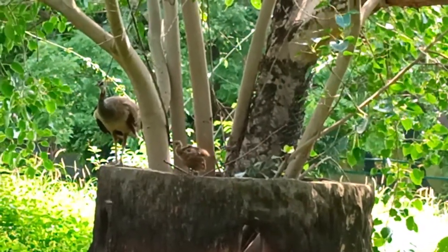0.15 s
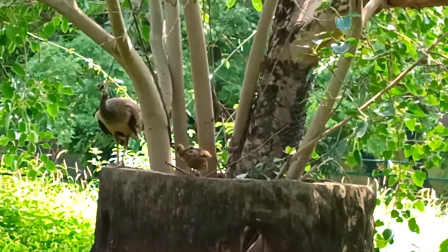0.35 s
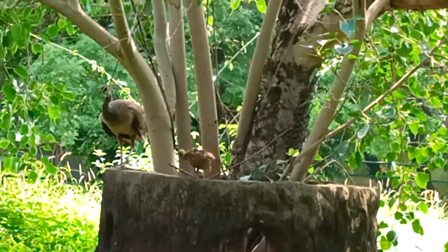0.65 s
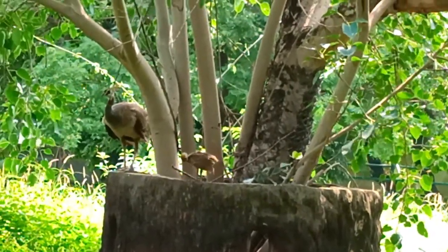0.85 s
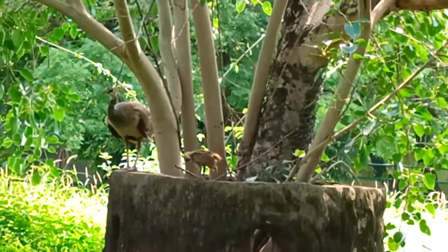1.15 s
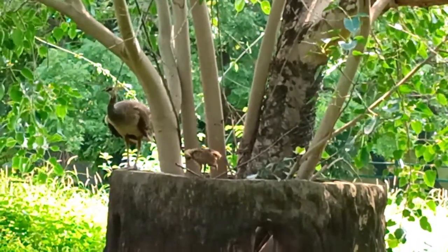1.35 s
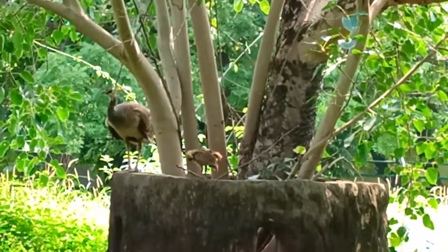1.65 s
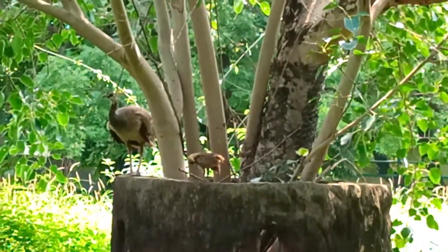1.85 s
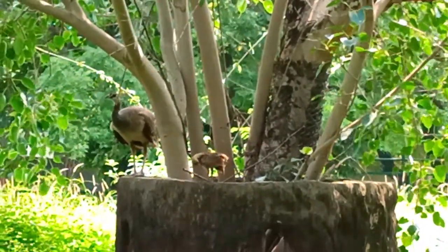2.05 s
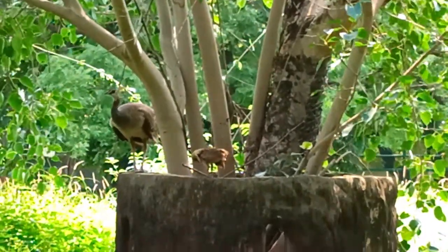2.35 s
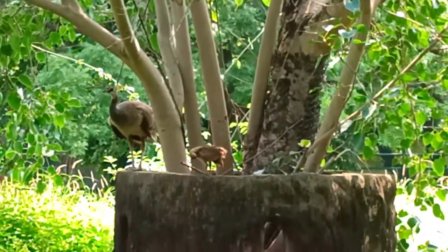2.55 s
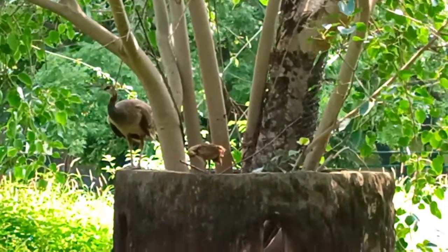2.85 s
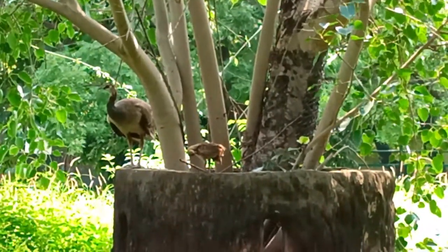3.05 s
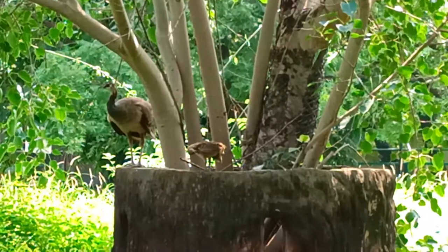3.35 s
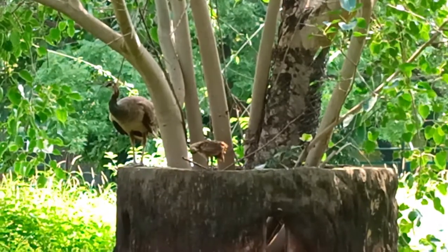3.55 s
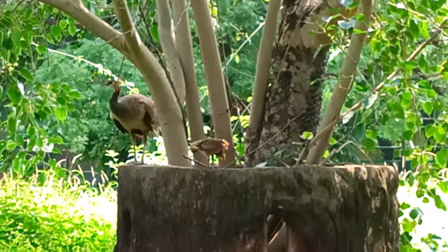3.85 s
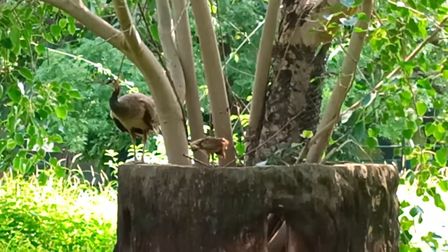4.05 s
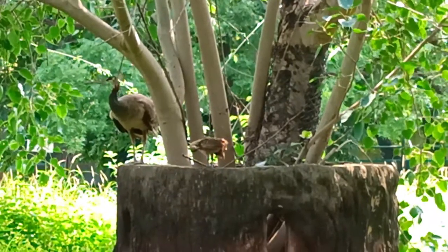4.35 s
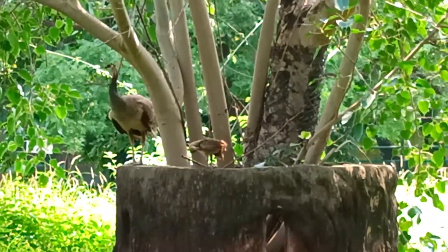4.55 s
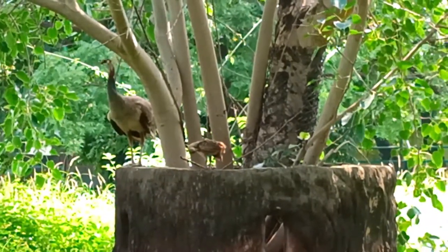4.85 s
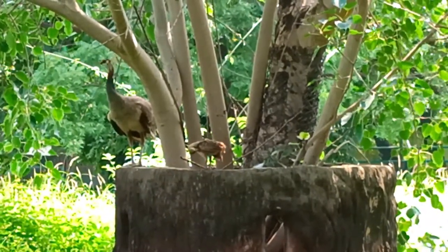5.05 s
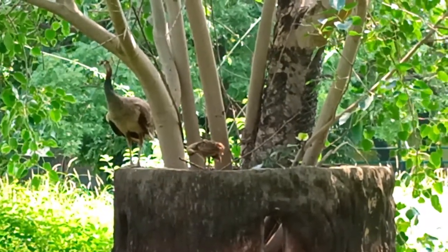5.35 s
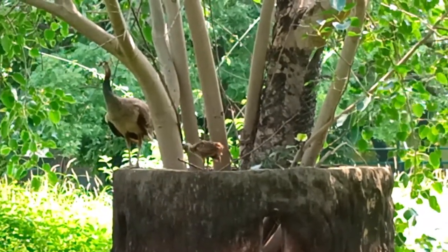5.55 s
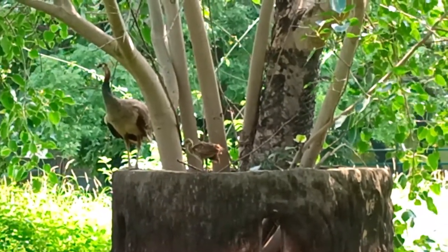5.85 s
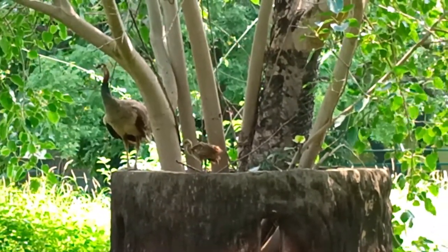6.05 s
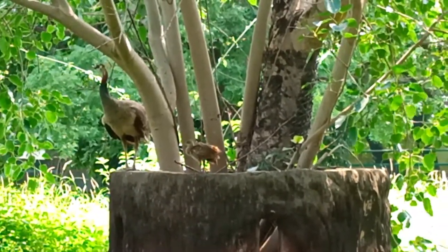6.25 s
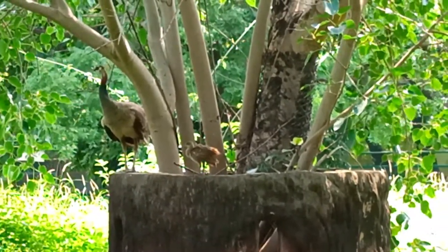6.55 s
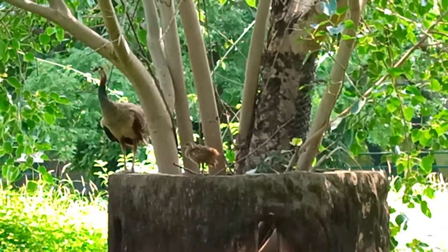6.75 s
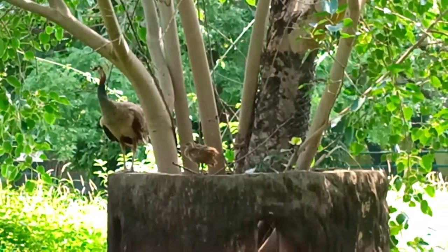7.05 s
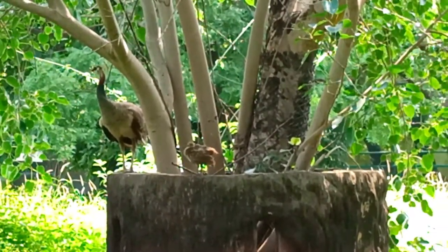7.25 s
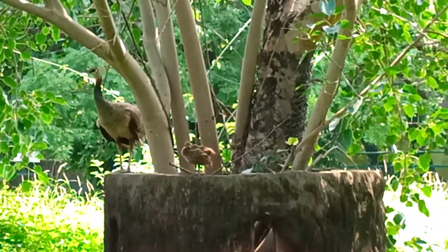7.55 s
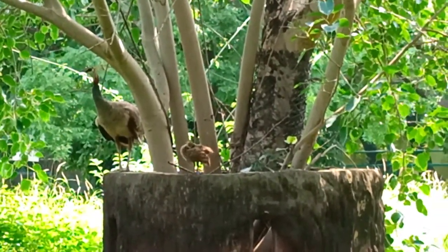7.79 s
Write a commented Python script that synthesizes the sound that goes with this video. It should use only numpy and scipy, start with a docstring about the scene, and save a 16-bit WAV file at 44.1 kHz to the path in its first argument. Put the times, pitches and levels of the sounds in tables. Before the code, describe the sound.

A handheld microphone picks up a strident, honking peafowl voice with a clear woodland echo. Two spaced cries break upward and fall away; a tiny dropout and close handling-like squeaks lead into one sinking wail and one hesitant climbing wail. Then three full cries arrive in quicker succession. Between them soft distant traffic, leaf noise, a thin insect whirr and low engine rumble swell back up.

```python
"""A peafowl cries loudly five times among trees: each time a short low note leaps into a long arch. Midway the
sound drops out briefly and comes back on the sinking end of a cry; then the bird gives a lower, looser wail
that hesitates before it climbs, with scratchy squeaks close to the microphone. The voice is a stack of partials
shaped by throat resonances, plus puffs of air; filtered noise makes the grove throw each call back. Behind are
a noise wash of far traffic and leaves, an insect whirr, and a distant engine that fades and edges back up. Gain
control pushes the background down under the calls and lets it swell up again."""
import sys
import numpy as np
from scipy import signal
from scipy.fft import rfft, irfft, next_fast_len
from scipy.io import wavfile
from scipy.ndimage import uniform_filter1d, minimum_filter1d

SR = 44100
rng = np.random.default_rng(int(sys.argv[2]) if len(sys.argv) > 2 else 0)


def master_out(mix):
    """Clip the mix to full scale and print it as 16-bit PCM to the path in sys.argv[1]."""
    frames = np.transpose(np.atleast_2d(mix))
    ceiling = np.clip(frames, -1, 1)
    pcm = np.round(ceiling * 32767).astype(np.int16)
    wavfile.write(sys.argv[1], SR, pcm)


N = 349272
TIME = np.arange(N) / SR


# The five full cries. Each row: start, leap, crest and end in seconds, low note in Hz, crest in Hz,
# sag after the crest in Hz, level in dB, extra effort at the end in dB, brightness of the low note and
# of the arch in dB per octave, moment the beak is widest in seconds, lower and upper throat resonance then in Hz.
CRIES = [(0.159, 0.293, 0.555, 0.918, 670, 890.8, 41.9, 0, -1, -0.82, 2.5, 0.48, 1930, 3140),
         (1.718, 1.869, 2.170, 2.612, 650, 907.5, 52.75, 0.17, 3, -2.3, 3, 2.09, 1470, 2570),
         (5.369, 5.476, 5.685, 6.059, 683.4, 882, 36.13, 0, 3, -0.55, -1, 5.67, 2170, 3050),
         (6.366, 6.483, 6.650, 7.011, 698.4, 882.8, 34.52, 0, 4.5, 1.3, 0, 6.66, 1580, 2680),
         (7.498, 7.62, 7.775, 8.150, 700.4, 893.3, 54.2, 0.0031, 0, 0.73, -0.5, 7.83, 1513, 2530)]
# What voice and throat pass through in every cry: onset, low note, just before the leap, break, landing,
# settled, crest, last push, start of the fall, end. Each row: effort in dB, lower, upper and top throat
# resonance in Hz, brightness in dB per octave, treble in dB.
CRY_STAGES = [(-16.5, 1800, 2000, 4300, -7.5, -16.5), (2, 1854, 3720, 4300, -2, -18),
              (-5, 1890, 3000, 5100, 4.5, -13), (-2, 1810, 2800, 3300, -15.5, -0.5),
              (6.5, 1735, 2500, 4900, -2, -0.5), (2.5, 1370, 2900, 4800, 0, 3),
              (2, 1720, 4300, 4700, -1, 1), (4.5, 1720, 3330, 4600, 1, 3), (5.5, 1620, 4100, 4900, 2, -1.5),
              (-9, 2020, 2980, 4800, -2, -16.5)]


def cry(start, leap, crest, end, low_hz, crest_hz, sag_hz, level_db, end_db,
        low_bright, arch_bright, widest, open_lower, open_upper):
    """A low note leaps into an arch; effort and throat pass through the same stages each time."""
    scoop_hz, scoop_s = 46.7, .0558
    leap_s, leap_curve = .021, 1.4
    climb_hz_per_s2, sag_curve = 2200, 1.3
    fall_s, fall_hz, fall_curve = .15, 162.4, 1.35
    break_s, land_s, settle_s = .018, .037, .11  # counted from the leap
    push_share = .6  # the last push comes this far from the crest to the fall
    gape_s = .13  # the beak is wide open for about this long either side of its widest

    t = np.arange(start, end, 1 / SR)
    fall = end - fall_s
    fallen = np.maximum(t - fall, 0) / fall_s

    # pitch: a scoop into the low note, a leap, a rounded climb to the crest, a slow sag, a final fall
    low = low_hz - scoop_hz * np.maximum(1 - (t - start) / scoop_s, 0) ** 2
    arch = crest_hz - climb_hz_per_s2 * np.maximum(crest - t, 0) ** 2
    arch -= sag_hz * (np.maximum(t - crest, 0) / (fall - crest)) ** sag_curve
    arch -= fall_hz * fallen ** fall_curve
    leapt = 1 - np.exp(-(np.maximum(t - leap, 0) / leap_s) ** leap_curve)
    pitch_hz = blend(low, arch, leapt)

    push = crest + push_share * (fall - crest)
    stage_s = [start, start + scoop_s, leap, leap + break_s, leap + land_s, leap + settle_s,
               crest, push, fall, end]
    columns = np.transpose(CRY_STAGES)
    effort_db, lower, upper, top, bright, treble_db = (np.interp(t, stage_s, c) for c in columns)
    effort_db = effort_db + end_db * fallen + level_db
    bright = bright + blend(low_bright, arch_bright, leapt)

    # the opening beak draws two resonances to their wide-open places
    gape = np.exp(-((t - widest) / gape_s) ** 4)
    lower = blend(lower, open_lower, gape)
    upper = blend(upper, open_upper, gape)
    no_odd_boost = np.zeros(len(t))
    return call(t, (pitch_hz, effort_db, lower, upper, top, bright, treble_db, no_odd_boost))


# The sinking end of a cry, heard as the sound comes back after the dropout, and a lower, looser wail that
# hesitates before it climbs. Each row: time in seconds, pitch in Hz, effort in dB, lower, upper and top throat
# resonance in Hz, brightness in dB per octave, treble in dB, odd overtones in dB.
SINKING_CRY_END = [(3.65, 717, 1, 1310, 2570, 4970, 1.5, -5, 5),
                   (3.85, 696.8, 0, 1290, 3110, 4800, 3.5, -3.5, -12.5),
                   (3.97, 682, 1, 1320, 2830, 4350, 0.5, -1, -0.5),
                   (4.04, 663, -2.5, 1380, 2610, 4340, 4.5, -3, -7.5),
                   (4.081, 617, -8, 1240, 2600, 4420, -4.5, -9, -5.5)]
CLIMBING_WAIL = [(4.28, 627, -17, 1580, 2520, 4500, -1.5, -1.5, -15.5),
                 (4.337, 629, -12, 1580, 2510, 4500, -2, -0.5, -15),
                 (4.385, 663.6, 1.5, 1460, 2620, 4700, 0.5, -9, -15),
                 (4.494, 620.2, -2.5, 1830, 2680, 4500, 1.5, -8.5, 4.5),
                 (4.56, 609.6, -6.5, 1797, 2650, 4500, 0.5, -9.5, -1.5),
                 (4.601, 682, -1, 1540, 2430, 4750, -1.5, -8, 0.5),
                 (4.842, 773.2, 5, 1515, 2660, 4700, 2.5, -2.5, -3),
                 (4.921, 782.6, 5.5, 1505, 2700, 4720, 2, -4, 3),
                 (4.972, 774.6, 3.5, 1520, 2563, 4610, -7, -9, 2),
                 (5.053, 653, -11.5, 1754, 2420, 4500, 3, -15.5, -5.5)]


def wail(curve):
    """The same voice gliding freely along a short curve."""
    s, *columns = np.transpose(curve)
    t = np.arange(s[0], s[-1], 1 / SR)
    return call(t, [np.interp(t, s, c) for c in columns])


# Fixed colour of windpipe and beak. Each row: frequency in Hz, level in dB.
THROAT = [(620, -11), (770, -9), (880, 0), (1300, -4), (1750, -6), (2300, -14), (3500, -11), (4300, -13),
          (5400, -13.5), (6300, -14), (7400, -42), (8400, -41), (9800, -35), (12500, -54)]
# Colour of the air rushing through the syrinx. Each row: frequency in Hz, relative level in dB.
RASP = [(500, -21.5), (1000, -30), (1700, 7), (3000, 5.5), (5400, 12), (6600, -14), (7600, -35),
        (10000, -35.5), (14000, -53)]


def call(t, controls, jitter=0.00022, waver=0.002, rasp_db=-50, break_db=22, knee_hz=1700,
         treble_hz=4700, flicker_db=0.59, flicker_hz=60, hoarse=0.01):
    """The syrinx buzzes through three moving throat resonances; it turns hoarse where the pitch leaps or sags."""
    size = len(t)
    smooth = (uniform_filter1d(c, 400) for c in controls)
    hz, effort_db, lower, upper, top, bright, treble_db, odd_db = smooth

    # strain is full where the pitch moves at 1.4 octaves per second or faster
    octaves_per_s = uniform_filter1d(abs(np.gradient(np.log2(hz))) * SR, 1200)
    strain = np.minimum(octaves_per_s / 1.4, 1)
    # abs: smoothing can round a still pitch to just below zero
    tremble = (jitter + hoarse * abs(strain) ** 1.24) * drift(140, size)
    phase = 2 * np.pi * np.cumsum(hz * (1 + waver * drift(35, size) + tremble)) / SR

    k = np.arange(1, 17)[:, None]  # partial numbers
    f = k * hz
    colour_db = read(THROAT, f)
    colour_db += peak(f, lower, 490, 23.5) + peak(f, upper, 190, 12.9) + peak(f, top, 510, 6.6)
    colour_db += bright * np.clip(np.log2(f / knee_hz), 0, 1.5)
    colour_db += odd_db * (k % 2) * (k > 1)
    colour_db += treble_db * np.clip((f - treble_hz) / 900, 0, 1)
    # each partial swells and flickers on its own, the low ones least
    flicker = [.7 * drift(11, size) + flicker_db * drift(flicker_hz, size) for _ in k]
    colour_db += np.minimum(k, 5) * np.array(flicker)

    # throat and flicker shape the colour only; effort alone sets the loudness of the tone
    partials = gain_of(colour_db)
    partials /= np.sqrt((partials ** 2).sum(0) / 2)
    start_phase = 2 * np.pi * rng.random(k.shape)
    tone = (partials * np.cos(k * phase + start_phase)).sum(0)

    # air escapes in one puff each cycle, more of it under strain
    puffs = 1 + .5 * np.cos(phase)
    air = noise(RASP, size) * puffs * gain_of(rasp_db + break_db * strain)
    edges = np.clip((t - t[0]) / .005, 0, 1) * np.clip((t[-1] - t) / .015, 0, 1)
    return t[0], gain_of(effort_db) * edges * (tone + air)


# Scratchy squeaks close to the microphone. Each row: start in seconds, length in seconds, level in dB,
# start and end of the slide in Hz, width in Hz.
SQUEAKS = [(3.645, 0.11, -7.5, 5150, 5520, 600), (3.729, 0.025, -9, 5360, 4920, 506),
           (3.796, 0.009, -11, 2930, 3580, 1220), (3.802, 0.023, -2.5, 4900, 4030, 410),
           (4.315, 0.0082, -24.5, 3240, 3380, 1100)]


def squeaks(grain_db=1.5, grain_hz=220, scratch_db=-17):
    """Each is a grainy band of noise whose centre slides, over a faint wide scratch."""
    out = np.zeros(N)
    for s, length, db, start_hz, end_hz, width_hz in SQUEAKS:
        size = int(length * SR)
        phase = 2 * np.pi * np.cumsum(np.linspace(start_hz, end_hz, size)) / SR
        squeak = noise_band(width_hz, phase)
        squeak += gain_of(scratch_db) * drift(3700, size) * np.cos(phase)
        squeak *= gain_of(grain_db * drift(grain_hz, size))
        add(out, s, gain_of(db) * evened(squeak) * signal.windows.tukey(size, .5))
    return out


# Ring of the grove. Each row: frequency in Hz, time to die by 60 dB in seconds.
GROVE_RING = [(500, 0.93), (1600, 0.84), (2600, 0.49), (5000, 1)]
# Colour of that ring. Each row: frequency in Hz, relative level in dB.
GROVE_COLOUR = [(800, -3), (1700, 1), (2800, 4.5), (6000, -14)]
# Near reflections off ground, wall and trunks. Each row: delay in seconds, level in dB.
ECHOES = [(.0043, -34), (.017, -24.5), (.038, -25), (.066, -22.5)]


def grove(x, far_db=-19, build_s=0.049, leaves_db=-6, leaves_s=0.075, leaves_hz=4200):
    """A few near echoes, a quick treble scatter off the leaves, then the long ring of the grove."""
    size = int(1.5 * SR)
    age = TIME[:size]
    build = 1 - np.exp(-age / build_s)

    hz, t, z = signal.stft(noise(GROVE_COLOUR, size), SR, nperseg=256)
    decay = gain_of(-60 * t / read(GROVE_RING, hz)[:, None])
    far = build * signal.istft(z * decay, SR, nperseg=256)[1][:size]

    # leaves are too small to throw back the low notes
    high_pass = signal.butter(1, leaves_hz, "high", fs=SR)
    leaves = signal.lfilter(*high_pass, rng.standard_normal(size))
    leaves *= build * np.exp(-age / leaves_s)

    response = gain_of(far_db) * far / np.linalg.norm(far)
    response += gain_of(leaves_db) * leaves / np.linalg.norm(leaves)
    for delay, db in ECHOES:
        response[round(delay * SR)] += gain_of(db)
    return signal.fftconvolve(x, response)[:N]


# Colour of far traffic and leaves. Each row: frequency in Hz, relative level in dB per Hz.
WASH = [(25, -34.5), (60, -1), (110, -5), (250, -1.5), (550, -10.5), (980, 0), (1600, -6.5), (2400, -14),
        (5200, -20), (6400, -35.5), (7500, -58.5), (9600, -43.5), (13000, -67.5)]


def wash(level_db=-25, patchy_db=1.24, hiss_drop_db=-5, hiss_hz=2400):
    """Far traffic and leaves: noise with drifting patches; its hiss softens over a second after the dropout."""
    hz, t, z = signal.stft(noise(WASH, N), SR, nperseg=1024, noverlap=768)
    patches = uniform_filter1d(rng.standard_normal(z.shape), 10, axis=0)  # across frequency
    patches = evened(uniform_filter1d(patches, 16, axis=1))  # along time
    is_hiss = np.clip(2 * np.log2(hz / hiss_hz + 1e-9), 0, 1)[:, None]
    softer = is_hiss * np.clip(t - DROPOUT[1], 0, 1)
    z *= gain_of(level_db + patchy_db * patches + hiss_drop_db * softer)
    return signal.istft(z, SR, nperseg=1024, noverlap=768)[1][:N]


def insects(level_db=-41, centre_hz=4950, width_hz=330, from_s=3.4):
    """A thin, steady whirr of insects in the trees: a narrow noise band that fades in over half a second."""
    band = noise_band(width_hz, 2 * np.pi * centre_hz * TIME)
    return gain_of(level_db) * evened(band) * np.clip(2 * (TIME - from_s), 0, 1)


# The distant engine coming and going. Each row: time in seconds, level in dB.
ENGINE_LEVEL = [(0, -20.5), (.5, -27), (1.5, -26.5), (3.2, -35.5), (5, -38.5), (7.9, -33.5)]
# Its tones. Each row: multiple of the cycle rate, relative level in dB.
ENGINE_ORDERS = [(5, -12.5), (6, -4), (10, -4.5), (11, -7), (15, -10.5), (19, -14.5)]


def engine(cycle_hz=15.1, waver=.025, uneven=0.71):
    """Low orders of a distant engine, wavering in speed and strength."""
    phase = 2 * np.pi * np.cumsum(cycle_hz * (1 + waver * drift(6.87, N))) / SR
    hum = np.zeros(N)
    for k, db in ENGINE_ORDERS:
        strength = gain_of(db) * (1 + uneven * drift(19, N))
        hum += strength * np.cos(k * phase + 2 * np.pi * rng.random())
    level_db = np.interp(TIME, *np.transpose(ENGINE_LEVEL))
    return gain_of(level_db) * evened(hum)


def gain_of(db):
    """Decibels to amplitude."""
    return 10 ** (np.asarray(db) / 20)


def evened(x):
    """Scales to an rms of one."""
    return x / np.sqrt(np.mean(x ** 2) + 1e-20)


def blend(a, b, share):
    """Moves from a to b as share goes from 0 to 1."""
    return a + share * (b - a)


def read(points, hz):
    """Reads a table on a log-frequency axis."""
    f, value = np.transpose(points)
    return np.interp(np.log(hz + 1), np.log(f + 1), value)


def peak(f, centre, width_hz, height_db):
    """Gain in dB of one resonance."""
    return height_db / (1 + ((f - centre) / width_hz) ** 2)


def noise(points, size):
    """Noise with the given spectrum, at an rms of one."""
    spectrum = rfft(rng.standard_normal(size))
    colour = gain_of(read(points, np.fft.rfftfreq(size, 1 / SR)))
    return evened(irfft(spectrum * colour, size))


def drift(hz, size):
    """Random wandering, mostly slower than hz."""
    white = rfft(rng.standard_normal(next_fast_len(size + SR // 10)))
    low_pass = np.exp(-(np.linspace(0, SR / 2, len(white)) / hz) ** 2)
    return evened(irfft(white * low_pass))[:size]


def noise_band(width_hz, phase):
    """Two slow noises on a cosine and a sine carrier make a band of noise around the carrier."""
    size = len(phase)
    return drift(width_hz, size) * np.cos(phase) + drift(width_hz, size) * np.sin(phase)


def add(mix, s, sound):
    """Mixes a sound in at time s."""
    part = mix[round(s * SR):][:len(sound)]
    part += sound[:len(part)]


def scene():
    """The bird with its echoes, squeaks close to the microphone, and the background."""
    bird = np.zeros(N)
    for row in CRIES:
        add(bird, *cry(*row))
    for curve in (SINKING_CRY_END, CLIMBING_WAIL):
        add(bird, *wail(curve))
    return (bird + grove(bird) + squeaks() + wash() + insects() + engine())[None]


# The sound drops out briefly. The pair: from and to in seconds.
DROPOUT = (3.619, 3.655)
# How the treble dulls. Each row: frequency in Hz, gain in dB.
DULL = [(4500, 0.5), (5300, -2), (6200, -10.5), (7600, -1.5)]


def record(dry, threshold_db=-4, squeeze=0.97, recovery_db_per_s=55, dull_around_s=3.71, edge_hz=15500):
    """Gain control grabs each peak and recovers steadily; one dropout; the upper treble dulls; a band limit."""
    x = dry[0]
    # the held peak sinks at the recovery rate until a louder one lifts it
    peak_db = 20 * np.log10(1e-9 - minimum_filter1d(-abs(x), 200))
    fall = TIME * recovery_db_per_s
    held_db = np.maximum.accumulate(peak_db + fall) - fall
    over_db = np.maximum(held_db - threshold_db, 0)
    x = x / gain_of(squeeze * uniform_filter1d(over_db, 150))

    dropped = (TIME > DROPOUT[0]) & (TIME < DROPOUT[1])
    x = x * uniform_filter1d(np.where(dropped, .004, 1.), 260)

    dulled = irfft(rfft(x) * gain_of(read(DULL, np.fft.rfftfreq(N, 1 / SR))), N)
    x = blend(x, dulled, np.clip(2 * (TIME - dull_around_s) + .5, 0, 1))
    low_pass = signal.firwin(511, edge_hz, window=("kaiser", 9), fs=SR)
    return signal.oaconvolve(x, low_pass, "same")[None]


dry = scene()
out = record(dry)
master_out(out)
```